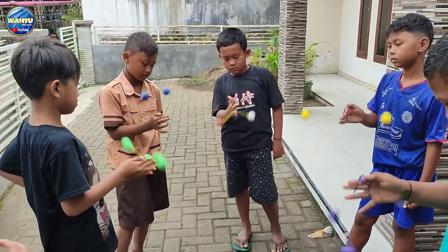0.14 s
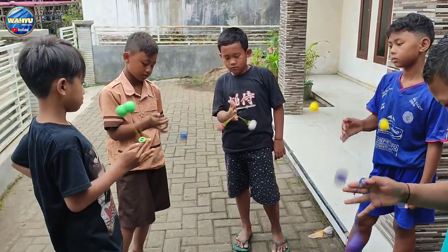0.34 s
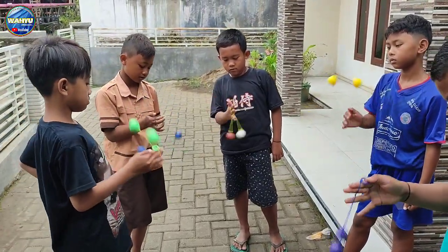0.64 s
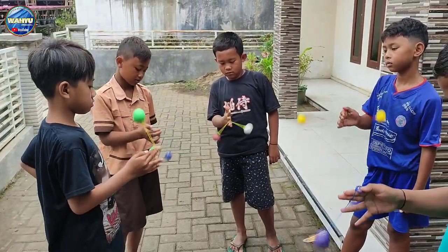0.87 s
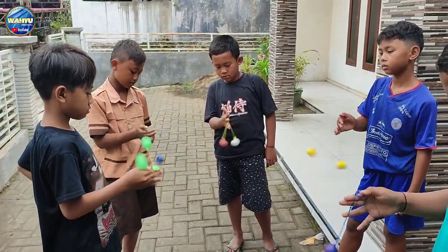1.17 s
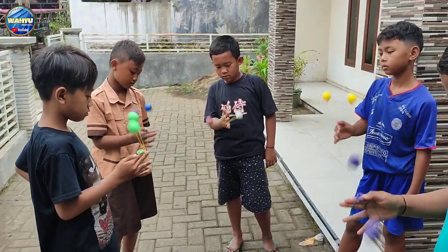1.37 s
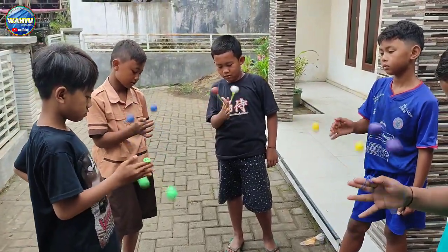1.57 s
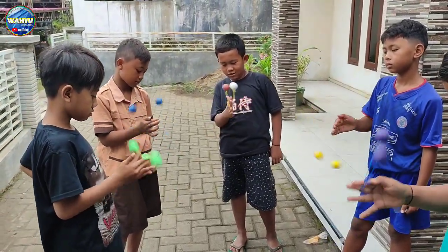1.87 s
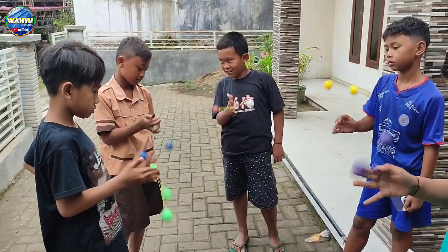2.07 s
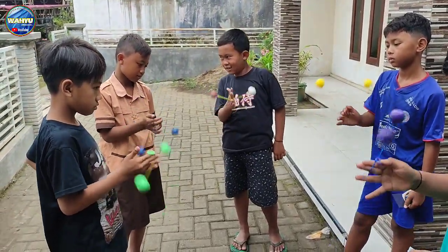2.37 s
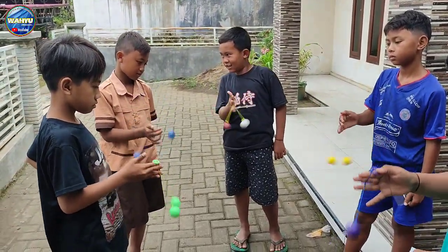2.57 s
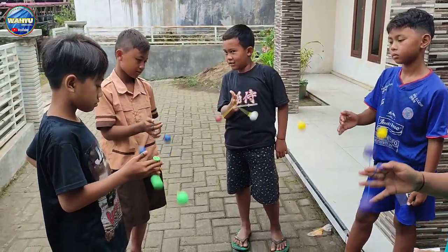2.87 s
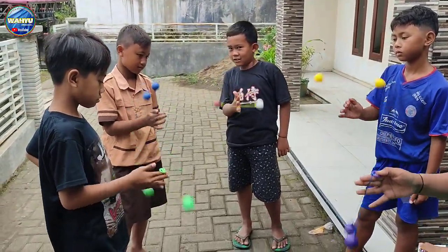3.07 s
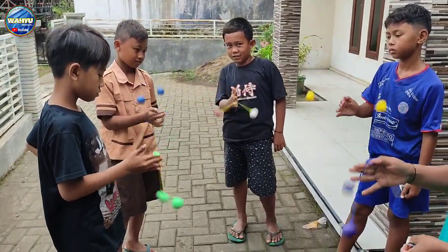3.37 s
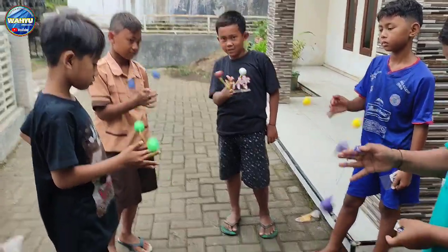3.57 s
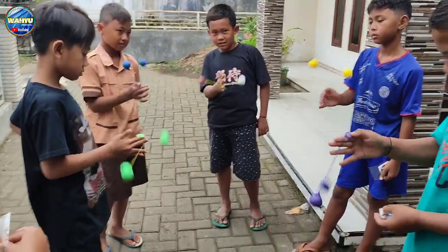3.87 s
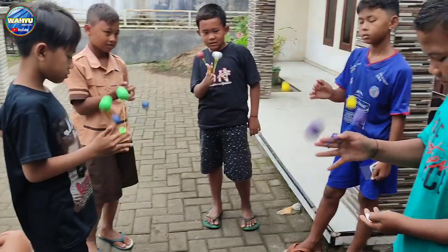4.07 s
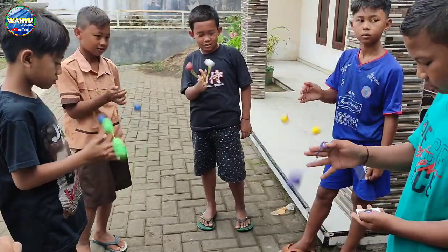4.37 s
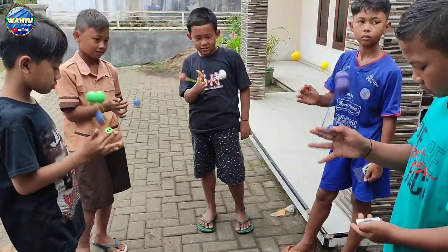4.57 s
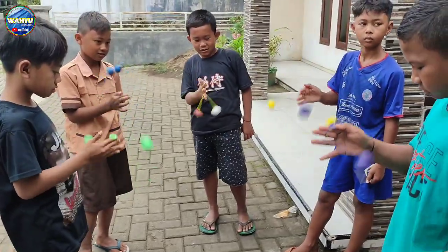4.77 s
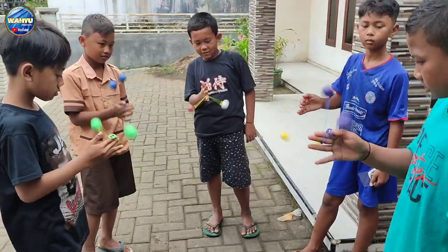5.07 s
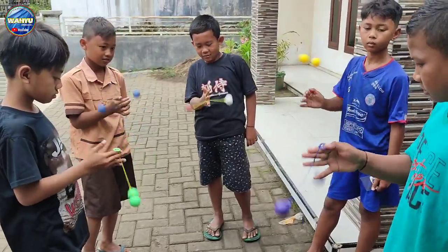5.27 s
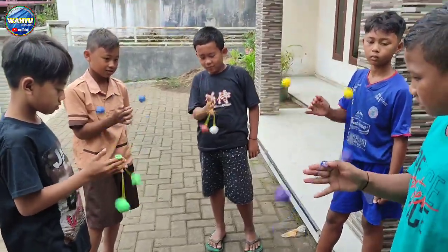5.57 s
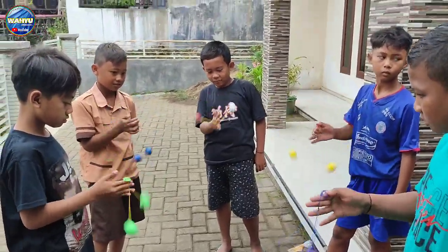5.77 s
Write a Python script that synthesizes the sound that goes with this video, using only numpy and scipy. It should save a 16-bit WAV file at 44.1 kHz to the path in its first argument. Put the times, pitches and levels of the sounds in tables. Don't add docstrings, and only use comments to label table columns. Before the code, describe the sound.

From 0 to about 6 seconds, pairs of hard plastic balls on strings clack without pause in a paved yard between walls. The clatter is already going at the start, with earlier hits still ringing. Two close, loud pairs each strike roughly every 0.13 seconds, alternating above and below the hand; their rhythms slide against each other, making doubled cracks and uneven rattles. A third pair, a little slower at about seven hits a second, is softer and farther until about 3 seconds, then closer, with occasional gaps. Stray hits stand out near 1.7, 4.1, 4.7 and 5.2 seconds. Every clack is a sharp midrange snap with quick ground and wall slaps and a half-second bright ring. Some near hits carry a slight thump on the right. Very quiet underneath: distant engine hum, soft hiss, and faint air puffs, mostly after 3.8 seconds. Close stereo pickup, little bass, peaks flattened, treble patchy. It cuts off mid-clatter.

```python
import sys
import numpy as np
from scipy import signal
from scipy.fft import rfft, irfft, next_fast_len
from scipy.io import wavfile
from scipy.ndimage import uniform_filter1d

SR = 44100
rng = np.random.default_rng(int(sys.argv[2]) if len(sys.argv) > 2 else 0)


def put_to_file(sound):
    columns = np.atleast_2d(sound).T
    safe = np.clip(columns, -1, 1)
    whole_steps = np.round(safe * 32767)
    wavfile.write(sys.argv[1], SR, whole_steps.astype(np.int16))


def boost(x):
    u = np.asarray(x, float) / 20
    return 10 ** u


N = 261459


def along(points, hz):
    f, v = np.transpose(points)
    return np.interp(np.log(hz + 1), np.log(f + 1), v)


def filtered(x, response):
    m = next_fast_len(x.shape[-1] + 8192)
    spectrum = rfft(x, m) * response(np.fft.rfftfreq(m, 1 / SR))
    return irfft(spectrum, m)[..., :x.shape[-1]]


# frequency in Hz, likeness from 0 to 1.
ALIKE = [(60, 0.79), (150, 0.77), (400, 0.86), (1400, 0.15), (15000, 0.76)]


def rush(size, spectrum):
    def turn(hz):
        return np.arccos(np.clip(along(ALIKE, hz), -1, 1)) / 2

    noise = rng.standard_normal((2, size))
    mid, side = filtered(noise, lambda hz: spectrum(hz) * np.array([np.cos(turn(hz)), np.sin(turn(hz))]))
    pair = np.array([mid + side, mid - side])
    return pair / pair.std()


# frequency in Hz, level in dB per Hz.
AIR = [(15, -46), (25, 12.5), (88, 8.5), (167, 13), (286, -8), (588, -9), (2630, -1), (4380, 12),
       (5570, -48), (7090, -23), (9770, -10), (12000, -3.5), (14200, -11.5), (15000, -65)]


def open_air():
    return boost(-44.5) * rush(N, lambda hz: boost(along(AIR, hz)))


# time in seconds, firings per second.
IDLE = [(0, 13.89), (.74, 13.905), (1.48, 13.88), (2.22, 13.826), (2.96, 13.75), (3.7, 13.665),
        (4.44, 13.6), (5.18, 13.595), (5.93, 13.68)]
# multiple of the firing rate, early level in dB, late level in dB.
EXHAUST = [(5, -123, -81), (6, -54.5, -52.5), (7, -53.5, -48), (8, -63, -102.5), (9, -54.5, -54),
           (10, -85, -59), (11, -54.5, -67), (12, -53, -58), (13, -54, -46.5), (14, -67, -56.5),
           (15, -65, -61), (16, -98, -66.5), (17, -58, -69), (18, -103, -62.5)]


def engine():
    t = np.arange(N) / SR
    turns = np.cumsum(np.interp(t, *np.transpose(IDLE))) / SR
    late = 1 / (1 + np.exp(-(t - 3.3) / 0.73))

    def path(multiple, delay, spread):
        return -np.cos(2 * np.pi * multiple * (turns - delay + spread * multiple))

    tone = np.zeros(N)
    for multiple, early_db, late_db in EXHAUST:
        tone += boost(early_db) * (1 - late) * path(multiple, .23, -.022)
        tone += boost(late_db) * late * path(multiple, .75, .01)
    return tone * boost([[3], [-1.5]])


# time in seconds, peak in dB, centre in Hz, length in seconds.
PUFFS = [(1.199, -46, 63, 0.045), (3.269, -55, 290, 0.044), (3.865, -41.5, 101, 0.033),
         (4.012, -39.5, 148, 0.018), (4.411, -38, 111, 0.024), (4.528, -40.5, 132, 0.035),
         (4.675, -35, 158, 0.029), (4.829, -37.5, 101, 0.016), (4.96, -41, 151, 0.018),
         (5.231, -42.5, 530, 0.017), (5.253, -47, 360, 0.027), (5.275, -48, 160, 0.01),
         (5.483, -50, 473, 0.027), (5.501, -48, 200, 0.022)]


def puffs():
    out = np.zeros((2, N + SR))
    for s, db, centre_hz, length in PUFFS:
        size = round(np.clip(length, .01, .2) * 1.77 * SR)
        lump = rush(SR // 4, lambda f: (f / centre_hz) ** 2 / (1 + (f / centre_hz / 1.22) ** 9))[:, :size]
        first = round(s * SR) - 400
        out[:, first:first + size] += boost(db) * lump / lump.std() * np.hanning(size)
    return out[:, :N]


def lingering():
    size = SR // 2
    fade = boost(-60 * np.arange(size) / SR / .5)
    ring = boost(-11.0) * rng.standard_normal((2, size)) * fade
    ring = np.pad(ring, ((0, 0), (0, N - size)))
    return filtered(ring, lambda f: np.exp(-((f - 4200) / 2500) ** 2))


# frequency in Hz, seconds to fade by 60 dB.
YARD = [(500, 0.057), (2000, 0.64), (5000, 0.51), (12000, 0.53)]


def yard(x, count=12):
    out, part = np.zeros((2, N + 2 * SR)), N // count + 1
    for first in range(0, count * part, part):
        hz, t, z = signal.stft(rng.standard_normal((2, SR)), SR, nperseg=128)
        fade = boost(-60 * t / along(YARD, hz)[:, None]) + 2.62 * boost(-60 * t / 0.027)
        gap = 1 - np.exp(-t / 0.0012)
        tail = signal.istft(z * fade * gap, SR, nperseg=128)[1]
        tail = tail / np.linalg.norm(tail[0])
        wet = signal.fftconvolve(x[None, first:first + part], tail, axes=1)
        out[:, first:first + wet.shape[1]] += wet
    return out[:, :N]


# time in seconds, peak in dB.
PUSHES = [(1.0633, -12.5), (1.199, -19), (1.327, -20), (1.4645, -19), (1.8586, -15.5), (2.126, -17.5),
          (2.4005, -17), (2.6762, -14.5), (2.9495, -14), (3.2275, -15), (3.4922, -12.5), (3.762, -23.5),
          (4.0307, -17), (4.8487, -24), (5.1147, -17), (5.387, -25)]


def pushes():
    s, db = np.transpose(PUSHES)
    around = np.arange(-30, 31)
    at = np.round(s * SR).astype(int)[:, None] + around
    bump = boost(db)[:, None] * np.exp(-(around / 1.8) ** 2)
    right = np.bincount(at.ravel(), bump.ravel(), N)
    return np.array([np.zeros(N), right])


def jolts(s, gain, hz, cycles):
    at = np.round(s * SR).astype(int)[..., None] + np.arange(-24, 25)
    turns = (at / SR - s[..., None]) * hz[..., None]
    wave = np.cos(2 * np.pi * turns) - np.exp(-(np.pi * cycles) ** 2)
    swing = -gain[..., None] * wave * np.exp(-(turns / cycles) ** 2)
    return np.bincount(np.clip(at, 0, N).ravel(), swing.ravel(), N + 1)[:N]


def clack(s, gain, hz):
    dull = jolts(s, gain, hz, cycles=0.5)
    tick = jolts(s, gain * np.abs(gain) ** .5, 0 * hz + 12800, cycles=1.43)
    return dull + boost(-19.5) * tick


# time in seconds, peak in dB.
NEAR_UP = [(0.0195, -1), (0.2751, -2), (0.5324, -0.5), (0.7975, 0), (1.0636, 0.1), (1.3271, 1.1),
           (1.5945, -1), (1.8589, 0.5), (2.1262, -0.5), (2.4002, 0), (2.6762, 0.6), (2.9499, -0.4),
           (3.2275, -1.3), (3.4924, 0.5), (3.7623, 0.8), (4.0308, 0.5), (4.2974, 0), (4.5713, 0.6),
           (4.8482, -8), (5.1147, -0.2), (5.387, 1.5), (5.6527, 1.5), (5.9248, -0.6)]
# time in seconds, peak in dB.
NEAR_DOWN = [(0.1493, -2.5), (0.4065, 1), (0.6709, 0), (0.9317, -4.5), (1.1994, -0.2), (1.4645, -0.5),
             (1.7326, -1), (1.9951, -2), (2.2685, -1.0), (2.539, -0.2), (2.8172, -1), (3.0934, 0),
             (3.368, -2.2), (3.6287, -0.0), (3.9022, -0.8), (4.1659, 3), (4.4386, 2), (4.7143, 1.5),
             (4.9835, 2.1), (5.2528, 1.6), (5.5255, 1.9), (5.7883, 2.3)]
# time in seconds, peak in dB.
SECOND_UP = [(0.098, 0.2), (0.3535, -1.5), (0.6178, -1.4), (0.8749, -1), (1.1437, -2), (1.4017, -0.5),
             (1.68, -1.5), (1.9411, -0.2), (2.1998, -1), (2.462, -5), (2.7221, -0.7), (2.9885, -0.5),
             (3.2622, -2.5), (3.5328, -3), (3.7952, -0.5), (4.0651, -3), (4.327, 1), (4.5859, -1.5),
             (4.8521, 1.9), (5.1266, -1), (5.4201, -0.7), (5.6898, -0.8)]
# time in seconds, peak in dB.
SECOND_DOWN = [(0.2293, -1.0), (0.486, -2.5), (0.749, 0.8), (1.011, -1.5), (1.2776, 1), (1.5425, -0.3),
               (1.8162, 1.5), (2.0738, -0.7), (2.3348, 1), (2.5946, -2.0), (2.8602, -2), (3.1278, -0.5),
               (3.4021, 1.6), (3.6691, -0.2), (3.9327, -1.1), (4.2017, -4), (4.4592, 0.7), (4.7205, -5),
               (4.9923, -2), (5.2793, -2.7), (5.5628, 0.9), (5.8245, -1.8)]
# time in seconds, peak in dB.
THIRD_FAR = [(0.159, -14), (0.3023, -8.5), (0.4452, -3.5), (0.5977, -3.5), (0.8995, -9), (1.0461, -5.8),
             (1.1912, -11), (1.3376, -14), (1.4913, -8.5), (1.6288, -1.5), (1.7692, -6), (1.9097, -4.5),
             (2.0569, -4), (2.1955, -5), (2.4756, -0.5), (2.6238, -9.5), (2.7667, -4.6), (2.9165, -5.5)]
# time in seconds, peak in dB.
THIRD_CLOSE = [(3.0605, -8), (3.2001, -7.5), (3.3367, -4.5), (3.4799, -8), (3.6176, -1.8), (3.8955, -9.5),
               (4.1787, -13), (4.359, -16), (4.4961, -7), (4.6288, -11.5), (4.7777, -6.5), (4.9239, -8.4),
               (5.0633, -3), (5.2055, -9), (5.3391, -4.5), (5.4844, -7), (5.6289, -6.5), (5.7765, -3.5),
               (5.9163, -8)]
# time in seconds, peak in dB.
STRAY = [(0.2445, -14), (0.7704, -26), (1.114, -13), (1.5832, -16), (1.6559, 0.5), (1.8332, -10),
         (2.1488, -15), (2.906, -29), (3.6075, -9.3), (3.781, -13), (3.978, -10), (4.1433, -1),
         (4.4723, -13), (4.689, -0.5), (4.8666, -8), (5.2401, -2), (5.6008, -6.5)]
# time in seconds, peak in dB.
FAINT = [(.2032, -12.5), (0.3927, -24), (0.5188, -18), (.5763, -23), (0.582, -16.5), (0.841, -28),
         (0.9432, -11.5), (1.1077, -26), (1.307, -16), (1.316, -27), (1.3714, -26), (1.902, -19),
         (2.0165, -14.5), (2.1701, -43), (2.3716, -18), (3.083, -14), (3.883, -19), (4.3263, -18),
         (4.4162, -16.5), (4.543, -19.5), (4.677, -16), (4.702, -40), (4.969, -16), (5.4, -15.5),
         (5.466, -20), (5.538, -20), (5.7954, -15.5)]
# (distance loss in dB, scatter in dB, ground echo in dB,
# left-right difference in dB at the start, and at the end).
PLACES = [
    (NEAR_UP, (.1, 1.5, -16.5, 1, -5)),
    (NEAR_DOWN, (1.33, -0.5, -7.5, -0.2, -8)),
    (SECOND_UP, (0, -1.5, -10.5, -7.5, -4)),
    (SECOND_DOWN, (1.9, 0, -5.5, -1.5, -7.5)),
    (THIRD_FAR, (3, 3.5, -4, -7.5, -1)),
    (THIRD_CLOSE, (-0.6, -1, -7.5, 3, -2.5)),
    (STRAY, (1.5, .1, -9, -6, -7)),
    (FAINT, (-4.8, 2.5, -2.5, -7, -12)),
]
# (ground echo in ms at start, at end).
PATHS = [(.265, 1.5, 10.4, (-.05, -.02), (1.45, .75)), (.255, 1.4, 9.8, (-.075, -.035), (1.45, .75)),
         (.23, 1, 12.5, (.105, .175), (1.45, .85)), (.23, 1, 12.5, (.16, .165), (1.52, 1.15)),
         (.23, 1, 14, (.15, .16), (1.4, 1.7)), (.23, 1, 14, (.1, .21), (1.2, 1.6)), (.23, 1, 8, (.1, .2),
         (1.5, 1.1)), (.23, 1, 8, (.15, .15), (1.3, 1.3))]


def collisions():
    rows = []
    for place, (meeting, paths) in enumerate(zip(PLACES, PATHS)):
        hits, (loss_db, scatter_db, echo_db, *pans) = meeting
        round_ms, share, wall_ms, lags, echoes = paths
        s, db = np.transpose(hits)
        pan_db, lag_ms, echo_ms = (np.interp(s, [0, N / SR], pair) for pair in (pans, lags, echoes))
        luck = rng.standard_normal((4, len(s)))
        pan_db = pan_db + 1.9 * luck[0]
        echo_ms = echo_ms * np.exp(0.073 * luck[1])
        scatter_db = scatter_db + 1.4 * luck[2]
        wall_ms = wall_ms * np.exp(0.036 * luck[3])
        rows.append(np.broadcast_arrays(s, db - loss_db, pan_db, scatter_db, echo_db, lag_ms,
                                        round_ms, share, echo_ms, wall_ms, place))
    return np.hstack(rows)


def clackers(count=22):
    (s, db, pan_db, scatter_db, echo_db, lag_ms,
     round_ms, share, echo_ms, wall_ms, place) = collisions()
    place = place.astype(int)
    hz = 4400 * np.exp(0.065 * rng.standard_normal(len(s)))
    far_s = s + lag_ms / 1000

    def at_left(late_ms, loss_db):
        return clack(s + late_ms / 1000, boost(db + loss_db + 4.5), hz)

    def at_right(late_ms, loss_db):
        gain = boost(db + loss_db - 5.0)
        straight = clack(far_s + late_ms / 1000, gain, hz)
        return straight + clack(far_s + (late_ms + round_ms) / 1000, share * gain, hz)

    ports = []
    for at, side, start, near_db in ((at_left, 1, s, -3), (at_right, -1, far_s, 1.2)):
        habit = rng.random((2, len(PLACES), count))[:, place]
        fresh = rng.random((2, len(s), count))
        after = 0.0004224 + 0.0061 * (np.arange(count) + 0.85 * habit[0] + 0.21 * fresh[0]) / count
        sign = habit[1] + fresh[1] - 1
        size = boost((db + scatter_db + near_db + 2.5)[:, None] - 60 * after / 0.019) * sign
        copy_hz = hz[:, None] * np.exp(0.2 * rng.standard_normal(after.shape))
        spray = clack(start[:, None] + after, size, copy_hz)
        direct = at(0, side * pan_db / 2)
        ground = at(echo_ms, echo_db)
        wall = at(wall_ms, -14)
        ports.append(direct + ground + wall + spray)
    return np.array(ports), at_left(0, 0)


def scene():
    near, source = clackers()
    near = filtered(near, lambda f: f ** 4 / (f ** 4 + 650 ** 4))
    answer = boost([[-7], [-3]]) * yard(source) + boost(-19.5) * lingering()
    return near + answer + engine() + puffs() + pushes() + open_air()


def smear(x):
    z = signal.stft(x, nperseg=256)[2]
    scrambled = z * np.exp(2j * np.pi * rng.random(z.shape))
    return signal.istft(scrambled, nperseg=256)[1][:, :N]


def thin(x):
    hz, t, z = signal.stft(x, SR, nperseg=1024)
    loud = (np.abs(z) ** 2).sum((0, 1))
    calm = loud < np.quantile(loud, .55)
    kept = uniform_filter1d(rng.random(z.shape[1:]), 3, 1) > .5
    gain = np.where((hz[:, None] > 7600) & calm, 1.3 * kept, 1)
    return signal.istft(z * gain, SR, nperseg=1024)[1][:, :N]


def starve(x, size=6):
    hz, t, z = signal.stft(x, SR, nperseg=384)
    power = np.abs(z[:, :-1]) ** 2
    bands = power.reshape(2, -1, size, len(t)).mean(2).mean(0)
    band_hz = hz[:-1:size]
    loud = uniform_filter1d(power.sum((0, 1)), 5)
    score = 10 * np.log10(bands / loud ** .7 + 1e-20)
    score -= .6 * np.median(score, 1, keepdims=True)
    luck = rng.standard_normal((2, len(bands), len(t) // 4 + 1))
    score += np.repeat(3 * luck[0] + 3 * luck[1, :1], 4, 1)[:, :len(t)]
    treble = band_hz > 7300
    limit = np.quantile(score[treble & (band_hz < 15000)], .5)
    drop = treble[:, None] & (score < limit)
    z[:, :-1] *= 1 - np.repeat(drop, size, 0)
    return signal.istft(z, SR, nperseg=384)[1][:, :N]


# frequency in Hz, level in dB.
PORTS = [(300, 6), (850, 4), (1200, -2), (1550, 0.5), (2500, 0.5), (6000, -3), (7500, -4.5), (8000, -8.5),
         (10000, -15), (13000, -7), (16000, -26)]
# frequency in Hz, left minus right in dB.
TILT = [(100, 10), (600, 1), (1200, 5.5), (2500, 0), (5000, -2.5), (9000, 2), (14000, 1)]


def microphone(x):
    def colour(hz):
        db = along(PORTS, hz) + np.outer([.5, -.5], along(TILT, hz))
        return boost(db * (hz > 250))

    x = filtered(x, colour)
    return x / (1 + np.abs(x / 0.86) ** 8) ** (1 / 8)


def top_cut(x):
    return signal.sosfilt(signal.butter(12, 16500, fs=SR, output="sos"), x)


def record(dry):
    x = microphone(dry)
    blur = boost(-9) * filtered(smear(x), lambda f: f > 1000)
    x = starve(thin(x + blur))
    x = filtered(x, lambda f: np.clip((16450 - f) / 1300, 0, 1))
    mix = np.clip(x, -.96, .96)
    return top_cut(mix)


dry = scene()
out = record(dry)
put_to_file(out)
```